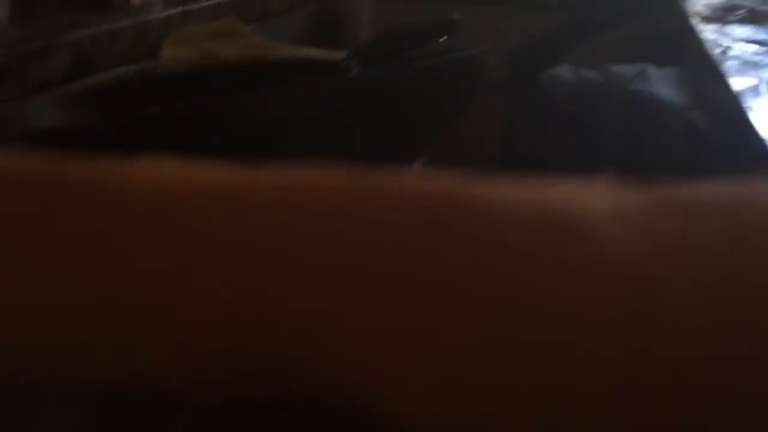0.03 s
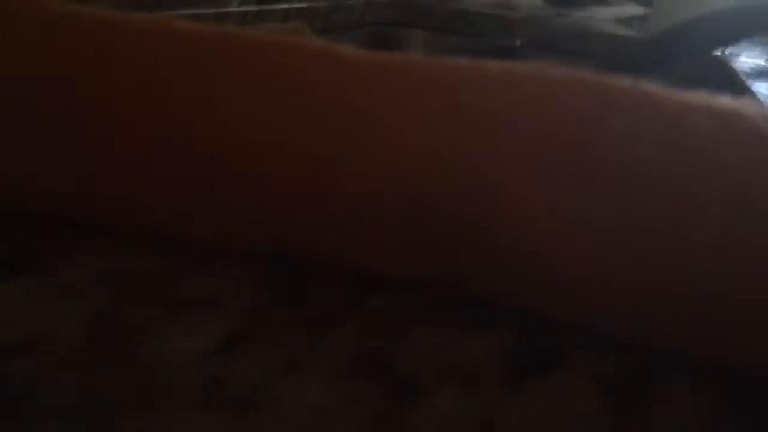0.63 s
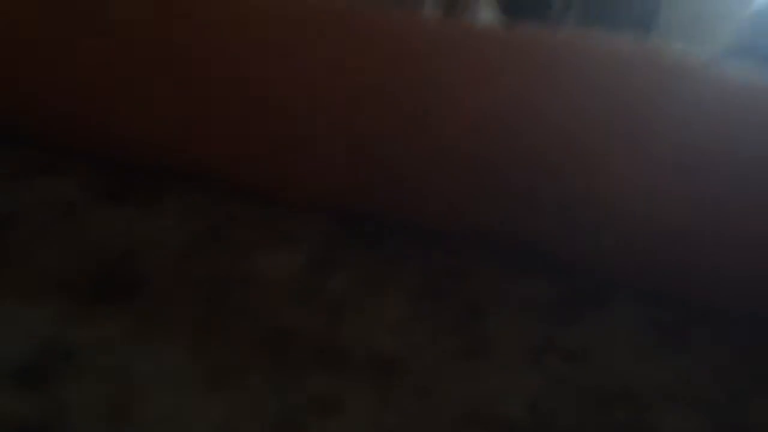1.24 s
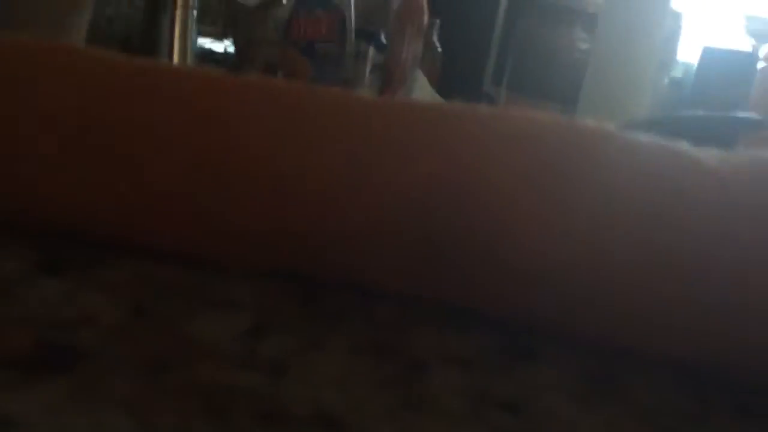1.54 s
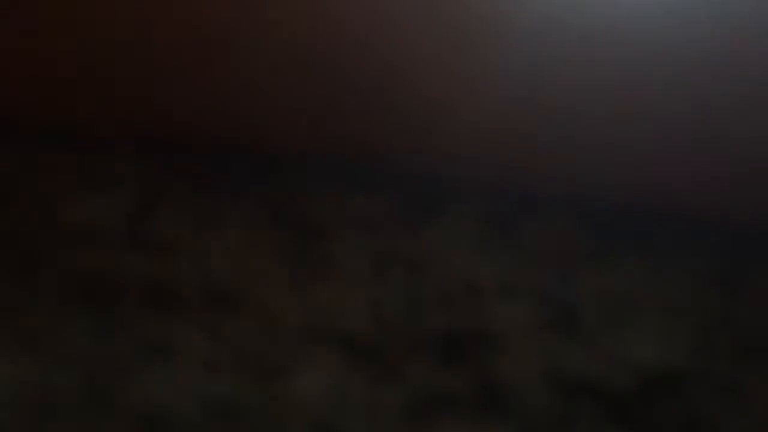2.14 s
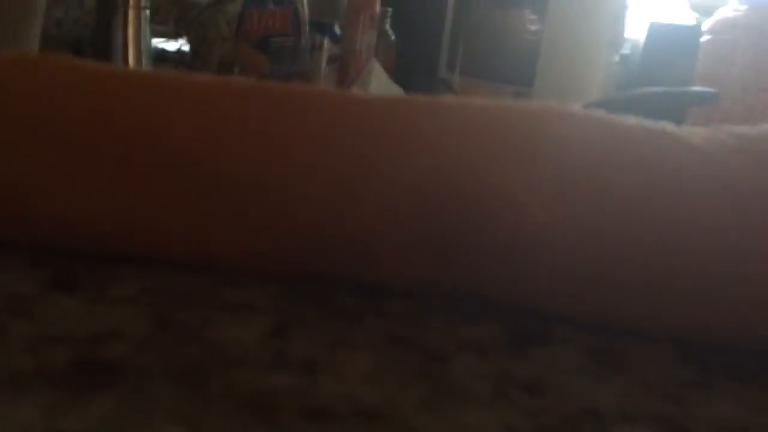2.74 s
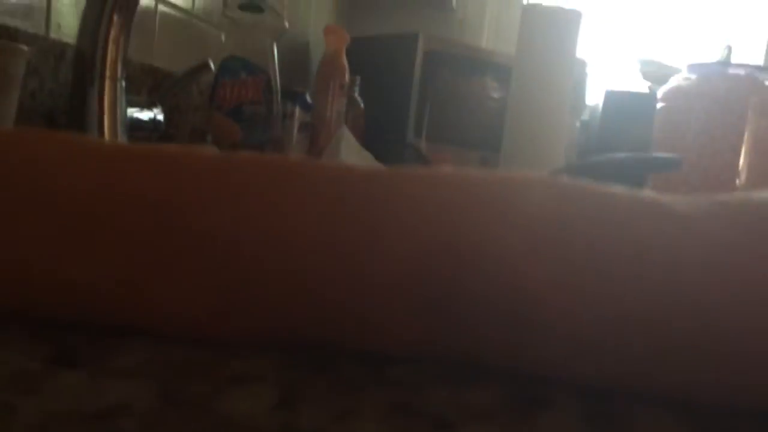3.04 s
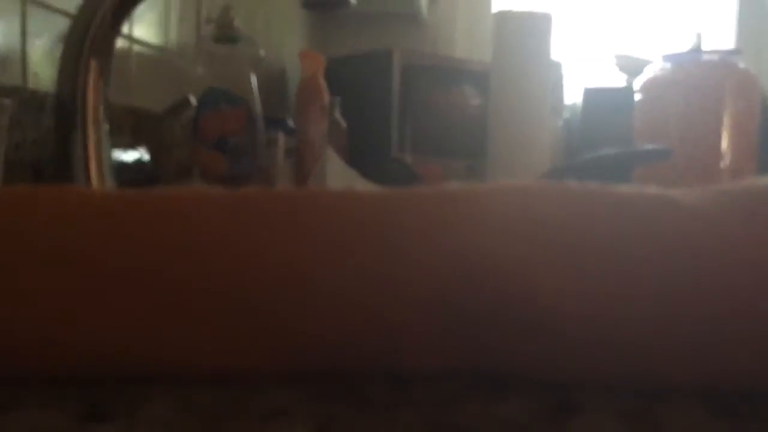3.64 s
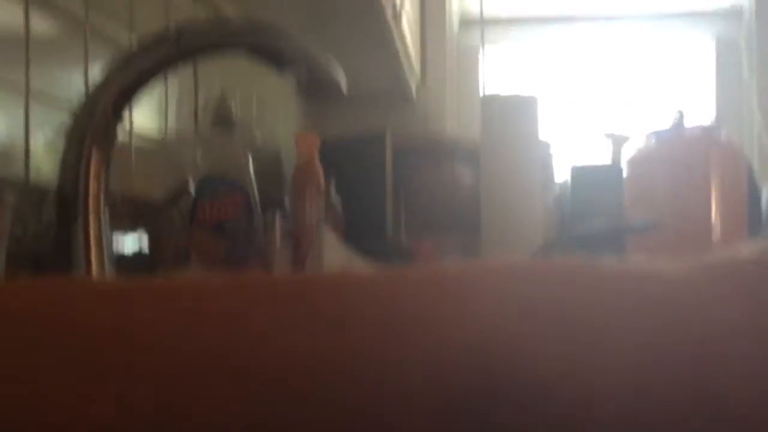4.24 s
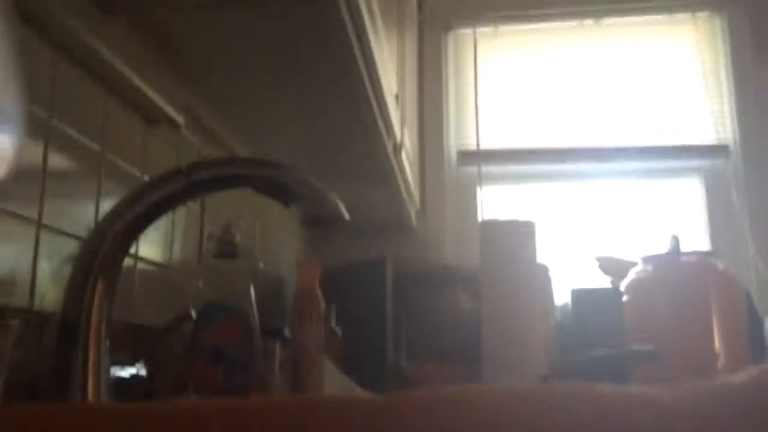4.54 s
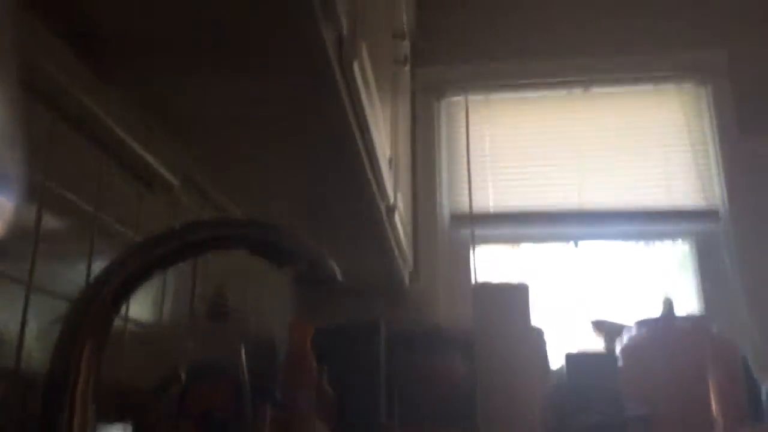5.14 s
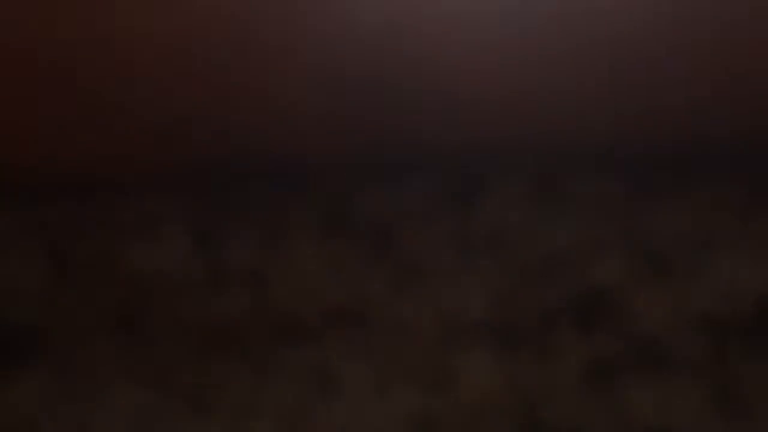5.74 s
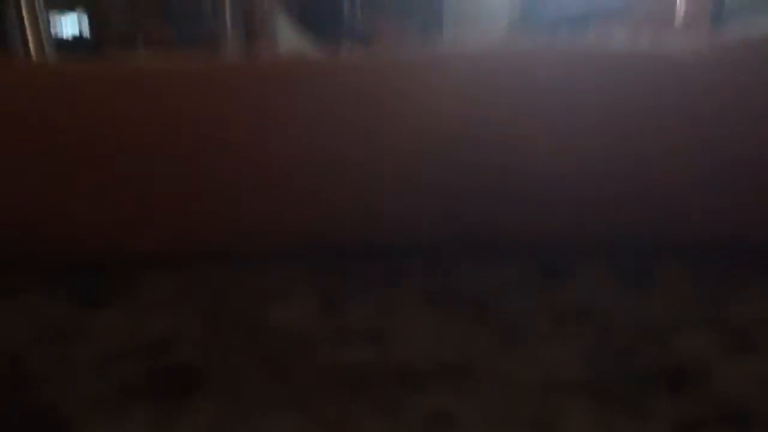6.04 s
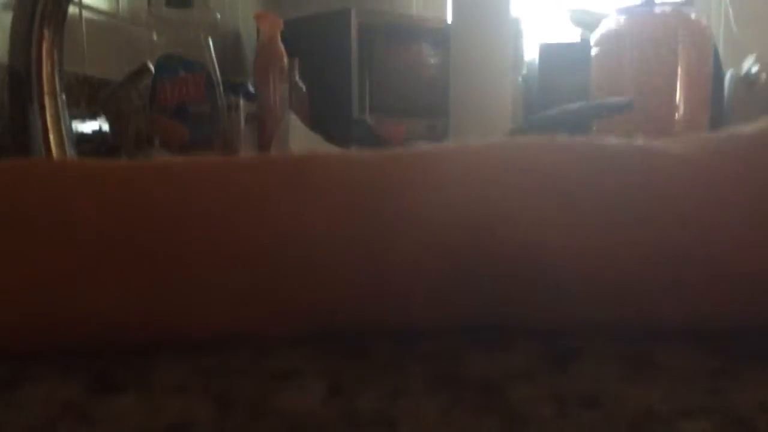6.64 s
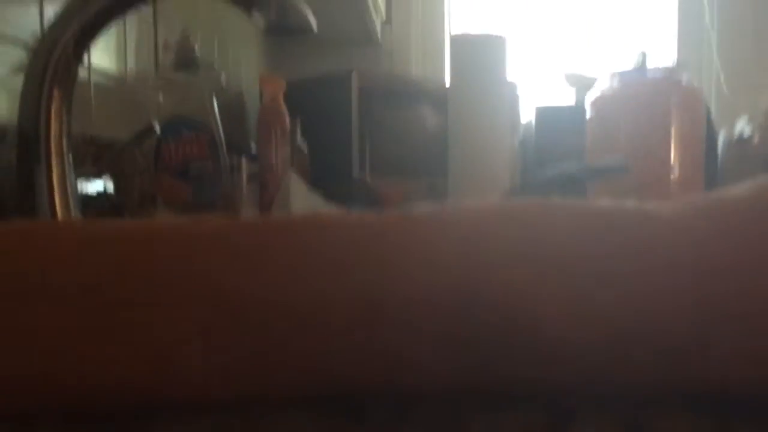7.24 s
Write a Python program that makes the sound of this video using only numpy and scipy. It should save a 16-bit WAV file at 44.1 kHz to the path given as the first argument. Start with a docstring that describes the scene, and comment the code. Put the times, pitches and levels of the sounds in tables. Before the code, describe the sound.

Faint, close rubbing of skin on wet cloth comes in short, uneven strokes with little clicks as the fibres let go. The phone picking it up is being moved about, so its case scuffs, rumbles and takes a few sharp, briefly ringing knocks. The rubbing thins out in the second half, leaving scattered taps and scuffs over the low hum of a kitchen appliance.

```python
"""Wet cloth at a kitchen sink

Hands work a wet cloth right beside a phone that is being shifted about. Cloth and skin
catch and slip in short strokes, and wet fibres let go with little snaps. The grip rumbles
through the phone's case, fingers tap it, and a few sharp knocks make it ring.
Under it all an appliance hums in the small, hard room."""
import sys
import numpy as np
from scipy import signal
from scipy.fft import rfft, irfft, next_fast_len
from scipy.io import wavfile
from scipy.ndimage import uniform_filter1d, map_coordinates

SR = 44100
rng = np.random.default_rng(int(sys.argv[2]) if len(sys.argv) > 2 else 0)


def to_wav(sig):
    """Store sig (one row per channel, or 1-D mono) as 16-bit WAV at the path in sys.argv[1].

    Samples outside -1..1 are clipped; the rate is SR.
    """
    pcm = np.clip(np.atleast_2d(sig), -1, 1) * 32767
    pcm = np.round(pcm).astype(np.int16)
    wavfile.write(sys.argv[1], SR, pcm.T)  # frames by channels


N = 321108

# Strokes of the cloth (pressed cloth rasps, fibres hiss, the case is scuffed):
# start_s, length_s, rasp_db, hiss_db, scuff_db
CLOTH_STROKES = [(.005, 0.01, -63, -61, -72), (.058, 0.071, -59, -54.5, -58), (.155, 0.11, -57, -53, -65),
                 (.28, 0.1, -53.5, -51, -55.5), (.365, 0.075, -59.5, -70, -51.5), (.45, .06, -70, -67, -61),
                 (.505, .08, -59.5, -56, -58), (.595, 0.13, -54.5, -58, -60), (.72, 0.12, -52, -59.5, -60),
                 (.857, 0.0063, -44.5, -53, -50), (.89, 0.044, -63, -57, -65),
                 (.988, 0.062, -58.5, -66.5, -57), (1.085, 0.057, -73, -69, -60.5),
                 (1.14, 0.063, -57.5, -57, -56), (1.205, 0.086, -53.5, -57.5, -54.5),
                 (1.29, .07, -64, -56, -53.5), (1.38, 0.2, -66, -65.5, -58.5),
                 (1.6, 0.34, -64.5, -66.5, -60.5), (1.89, 0.069, -59.5, -59.5, -53.5),
                 (1.96, 0.11, -62.5, -65, -58), (2.125, .18, -63, -64.5, -56.5),
                 (2.32, 0.24, -69.5, -72.5, -58), (2.55, 0.18, -66, -68, -59.5),
                 (2.755, 0.089, -62.5, -73, -56), (2.832, 0.065, -56.5, -69, -57),
                 (2.915, 0.02, -66.5, -84, -58), (3.103, 0.15, -64.5, -76, -58),
                 (3.262, 0.041, -61, -65.5, -55), (3.342, 0.016, -62, -66, -54),
                 (3.405, 0.049, -62.5, -74, -60.5), (3.5, 0.11, -58.5, -68.5, -57.5),
                 (3.935, 0.022, -62.5, -60.5, -55), (4.012, 0.024, -63.5, -67, -59),
                 (4.148, 0.036, -70, -73, -59.5), (4.205, 0.036, -60.5, -64, -54),
                 (4.305, 0.053, -61.5, -65.5, -57.5), (4.38, 0.18, -77, -79, -66),
                 (4.815, 0.019, -77, -77, -62), (5.045, 0.024, -68.5, -70, -63),
                 (5.21, 0.0051, -65, -65, -56), (5.257, .008, -70, -70, -57), (5.28, .025, -72, -79, -67),
                 (5.51, 0.11, -69.5, -70, -57.5), (5.69, 0.058, -72.5, -79, -63.5),
                 (5.78, 0.047, -67.5, -71, -59.5), (5.9, 0.047, -62, -66.5, -57.5),
                 (5.965, 0.053, -69.5, -76, -56.5), (6.04, 0.2, -80, -75, -62), (6.18, 0.22, -72, -71, -56),
                 (6.36, .065, -59, -64, -61.5), (6.46, 0.0072, -66, -67, -55),
                 (6.772, 0.019, -72.5, -84, -61), (7.122, 0.0067, -71, -78, -56.5),
                 (7.172, 0.0081, -70, -78, -61)]
# The hollow under the hand changes size and seal: time_s, pitch_hz, whistle_over_rasp_db
HAND_HOLLOW = [(.2, 3580, -7), (.43, 3280, -4), (.62, 2970, -4), (.8, 2750, -1), (.87, 2620, -5),
               (1.0, 2730, -3), (1.26, 2670, 0), (2.0, 2300, -12), (2.87, 2560, -8), (3.3, 2310, -23),
               (3.55, 3100, -1), (4.04, 3260, -2), (4.3, 3030, -14), (6.0, 2300, -6), (6.33, 3170, 1),
               (6.42, 3100, 1), (6.8, 2290, 1)]
# Quick swipes of tight cloth: middle_s, half_length_s, pitch_hz, level_db
CLOTH_SWIPES = [(.123, .015, 4260, -58.5), (0.173, 0.021, 6600, -54.5), (0.347, .021, 4350, -54),
                (.88, 0.026, 4950, -55.5), (2.863, 0.054, 6500, -67), (3.348, 0.0077, 10000, -66),
                (3.954, .014, 10500, -64), (4.216, 0.013, 5000, -63), (5.92, 0.019, 5600, -61.5)]
# The fingers shift their grip on the case: start_s, length_s, drag_db, rumble_db
GRIP_SHIFTS = [(0, 0.026, -71, -50), (.08, 0.074, -53.5, -49), (.235, 0.069, -56, -51.5),
               (.33, .09, -60, -58), (.52, 0.29, -60.5, -60), (.75, 0.13, -61, -51),
               (1.14, 0.23, -61.5, -58), (1.4, 0.26, -69, -74), (1.96, 0.1, -57, -73),
               (2.15, .2, -63.5, -76), (2.495, 0.23, -50, -56), (2.595, 0.047, -47, -59),
               (2.78, 0.37, -60.5, -67), (3.125, 0.038, -51, -67), (3.22, .34, -50, -70),
               (3.26, 0.046, -52.5, -59), (3.93, 0.025, -54, -58), (4.18, .17, -58, -58.5),
               (4.81, .02, -60, -71), (4.98, 0.04, -56, -64), (5.72, 0.054, -53, -65),
               (5.877, .12, -56.5, -53.5), (6.2, 0.037, -48.5, -58), (6.28, 0.16, -54.5, -64),
               (6.9, 0.28, -60, -66)]
# Knocks on the phone: time_s, ring_db, crack_db, spot (0, 1 or 2)
PHONE_KNOCKS = [(1.0302, -0.5, -48, 0), (1.0533, -10, -62, 0), (3.588, 0, -30, 1), (5.5671, 2, -52, 2),
                (5.893, -20, -58, 2)]
# Ringing tones of the phone and what it leans on (a fade is the time to drop by 60 dB):
# pitch_hz, fade_s, spot_0_db, spot_1_db, spot_2_db
CASE_TONES = [(84, 0.13, -41, -33, -60), (177, 0.036, -29.5, -38, -20.5), (235, 0.022, -44, -27, -15.5),
              (325, 0.023, -33.5, -15.5, -19.5), (490, 0.081, -31.5, -25.5, -25),
              (616, 0.014, -20, -15, -23), (878, 0.011, -29, -8, -32.5), (1170, 0.023, -34.5, -18.5, -42),
              (1365, 0.015, -41, -12.5, -36.5), (1660, 0.0094, -38, -40, -42), (855, 0.15, -66, -30, -47.5),
              (705, 0.5, -67, -46.5, -56)]
# Snaps of wet fibres: time_s, peak_db, pitch_hz
FIBRE_SNAPS = [(.053, -41, 2460), (0.5825, -32.5, 2960), (0.8617, -32, 2500), (1.041, -32.5, 4070),
               (1.063, -38, 3000), (1.077, -37, 4500), (1.088, -43, 5000), (1.2866, -45, 2000),
               (2.2998, -43, 2500), (2.631, -40, 3500), (2.847, -35.5, 2700), (3.296, -38, 2300),
               (3.5998, -39, 2970), (3.6202, -43, 3000), (3.6296, -41, 3440), (3.6565, -46, 3800),
               (4.2045, -46, 3000), (4.356, -48, 3500), (4.815, -48, 3000), (5.067, -46.5, 4000),
               (5.259, -46, 2200), (5.436, -48, 3100), (6.149, -44.5, 2150), (6.468, -42, 3300),
               (6.541, -50, 2780), (7.182, -56, 1580)]
# Palm bumps and fingertip taps: time_s, level_db, pitch_hz
HAND_TOUCHES = [(0.085, -30, 146), (.114, -36, 105), (.163, -37, 61), (0.293, -39, 108), (.368, -43, 1420),
                (0.411, -43, 1060), (1.031, -36, 114), (1.2863, -29.5, 1290), (2.301, -34.5, 1500),
                (2.4516, -37.5, 900), (2.609, -35, 310), (3.2622, -51, 1300), (3.52, -46, 1400),
                (3.945, -35.5, 282), (4.2025, -41, 1490), (4.3967, -39.5, 1460), (5.214, -42, 1380),
                (5.4358, -33.5, 1380), (7.17, -43, 1480)]
# The tone colour of each noise, from low to high: frequency_hz, relative_db
HISS_COLOUR = [(1200, 2.5), (2500, -3.5), (4500, 2), (6500, 1.5), (9000, -1), (12000, -4), (15000, -5)]  # sliding fibres
RASP_COLOUR = [(1200, -9.5), (1900, 0), (2500, 2.5), (3600, -5), (5000, -9.5), (9000, -43)]  # pressed cloth
SCUFF_COLOUR = [(300, -12), (600, 3), (800, 0.5), (1080, -1.5), (1400, 0), (1900, -9.5), (3000, -35)]  # rubbing on the case
DRAG_COLOUR = [(90, -23), (180, 0.5), (240, 8.5), (310, 11.5), (420, 9), (600, 0), (1000, -48)]  # dragging fingers
RUMBLE_COLOUR = [(20, -41), (45, -1.5), (85, 6), (140, 5), (220, -2), (450, -49)]  # the grip, heard through the case
AIR_COLOUR = [(25, -50), (52, -0.5), (80, -3), (125, -1), (240, -6), (330, -3.5), (460, -5), (700, -12.5),
              (1100, -19), (1550, -26.5), (2000, -31.5), (4000, -35.5), (8000, -40.5), (15000, -43)]  # the soft rush of the room
# How long the kitchen's echo lasts: frequency_hz, fade_s
ECHO_FADES = [(100, 0.47), (700, 0.3), (2000, 0.04), (10000, 0.11)]
# The tones of the appliance: pitch_hz, level_db
HUM_TONES = [(117.6, -58.5), (81.4, -70.5), (326.6, -64.5), (404.4, -66.5), (497, -70.5)]
# The hand shields the microphone from the hum and the rush: time_s, gain_db
HAND_SHIELD = [(0, -3.5), (1.3, -5.5), (1.6, -5.5), (2.3, -8), (2.7, -1), (7.28, -2)]

STROKE_ATTACK_S, STROKE_RELEASE_S = 0.0086, 0.03
GRIP_ATTACK_S, GRIP_RELEASE_S = 0.019, 0.042  # the fingers move more slowly than the cloth
RESTING_SCUFF_DB, RESTING_RUMBLE_DB = -70, -61.5  # the holding hand is never quite still


def rubbing(cling_db=0.87):
    """Each stroke drags wet fibres over skin and case; all its noises catch and let go together."""
    rasp_gain, hiss_gain, scuff_gain = swells(CLOTH_STROKES, STROKE_ATTACK_S, STROKE_RELEASE_S)
    drag_gain, _ = swells(GRIP_SHIFTS, GRIP_ATTACK_S, GRIP_RELEASE_S)
    _, seal_db = curves(HAND_HOLLOW)
    catch_db = .8 * wobble(45) + .8 * wobble(220)
    fibres = coloured(slips(per_s=2700, spread_db=1, smooth=1.0), HISS_COLOUR)
    hiss = hiss_gain * folds(fibres, depth_db=2.0)
    whistle = hollow(slips(per_s=2000, spread_db=3, smooth=0.67), sharpness=5.0)
    pressed = coloured(slips(per_s=2400, spread_db=5, smooth=0.77), RASP_COLOUR)
    blend = amp(seal_db) * whistle + folds(pressed, depth_db=3.5)
    rasp = rasp_gain * blend / np.hypot(1, amp(seal_db))  # the seal changes tone, not strength
    case_rub = coloured(slips(per_s=900, spread_db=4.0, smooth=1.0), SCUFF_COLOUR)
    scuff = np.hypot(scuff_gain, amp(RESTING_SCUFF_DB)) * folds(case_rub, depth_db=3)
    drag = drag_gain * coloured(slips(per_s=400, spread_db=2.5, smooth=0.89), DRAG_COLOUR)
    cling = amp(cling_db * wobble(70))  # wet fibres cling and peel off unevenly
    cloth = lift_off() * cling * (hiss + rasp)
    return amp(catch_db) * (cloth + scuff + drag + swipes())


def slips(per_s, spread_db, smooth):
    """Rubbing surfaces stick and slip: tiny uneven clicks over smooth sliding noise."""
    clicks = rng.random(N) < per_s / SR
    size = rng.choice([-1, 1], N) * amp(spread_db * np.clip(rng.standard_normal(N), -2, 2))
    return unit(unit(clicks * size) + smooth * rng.standard_normal(N))


def folds(x, depth_db):
    """Folds of cloth come and go, each bringing out its own frequencies."""
    spectra = signal.stft(x, SR, nperseg=512)[2]
    patches = uniform_filter1d(rng.standard_normal(spectra.shape), size=6, axis=0)  # blur in pitch
    patches = uniform_filter1d(patches, size=10, axis=1)  # blur in time
    return unit(signal.istft(spectra * amp(depth_db * unit(patches)), SR, nperseg=512)[1][:N])


def hollow(x, sharpness):
    """The gap between hand and cloth brings out one pitch, which moves as the gap changes size."""
    hz, t, spectra = signal.stft(x, SR, nperseg=512)
    time_s, pitch_hz, _ = np.transpose(HAND_HOLLOW)
    peak = resonance(hz[:, None], np.interp(t, time_s, pitch_hz), sharpness) ** 2
    return unit(signal.istft(spectra * peak, SR, nperseg=512)[1][:N])


def lift_off(depth_db=22, length_s=0.1):
    """A brief dip in level: the cloth lifts off just after the knock with the loudest crack."""
    knock_s = max(PHONE_KNOCKS, key=lambda knock: knock[2])[0]
    after_s = np.arange(N) / SR - knock_s
    return amp(-depth_db * (after_s > 0) * np.exp(-(after_s / length_s) ** 2))


def swipes(sharpness=2.9):
    """Tight cloth slides fast and hisses around one pitch."""
    out, t = np.zeros(N), np.arange(N) / SR
    for middle_s, half_length_s, pitch_hz, level_db in CLOTH_SWIPES:
        hiss = filtered(rng.standard_normal(N), lambda hz: resonance(hz, pitch_hz, sharpness) ** 2)
        out += amp(level_db) * np.exp(-((t - middle_s) / half_length_s) ** 2) * unit(hiss)
    return out


def knocks(attack_s=0.00016, crack_fade_s=0.016):
    """Each knock cracks on the plastic and rings the same tones; the spot hit sets their balance."""
    out, t = np.zeros(N), np.arange(SR // 3) / SR
    hz, fade_s, *spots_db = np.transpose(CASE_TONES)
    direction = (-1) ** np.arange(len(hz))  # each tone swings the opposite way to the one before
    tones = direction[:, None] * np.sin(2 * np.pi * hz[:, None] * t) * amp(-60 * t / fade_s[:, None])
    for time_s, ring_db, crack_db, spot in PHONE_KNOCKS:
        ring = amp(ring_db + spots_db[spot]) @ tones * (1 - np.exp(-t / attack_s))
        crack = signal.lfilter(*signal.butter(2, 8500, fs=SR), rng.standard_normal(len(t)))
        add(out, time_s, ring + amp(crack_db - 60 * t / crack_fade_s) * crack)
    return out


def snaps(sharpness=1.0, brightness=0.031, crumble_cycles=5, crumble_gain=0.19):
    """A fibre or film of water lets go: one click and a brief crumble, shorter for higher snaps."""
    out, t = np.zeros(N), np.arange(2048) / SR
    hz = np.fft.rfftfreq(len(t), 1 / SR)
    click = t == 0
    for time_s, peak_db, pitch_hz in FIBRE_SNAPS:
        crumble = crumble_gain * rng.standard_normal(len(t)) * np.exp(-t * pitch_hz / crumble_cycles)
        snap = irfft(rfft(click + crumble) * (resonance(hz, pitch_hz, sharpness) + brightness))
        add(out, time_s, amp(peak_db) * snap / np.abs(snap).max())
    return out


def touches(fade_cycles=11.6):
    """A soft hand bumps the case and muffles it at once, so it swings only a few times."""
    out, t = np.zeros(N), np.arange(SR // 3) / SR
    for time_s, level_db, pitch_hz in HAND_TOUCHES:
        cycles = t * pitch_hz
        gain = amp(level_db - 60 * cycles / fade_cycles) * (1 - np.exp(-2 * cycles))
        add(out, time_s, gain * np.sin(2 * np.pi * cycles))
    return out


def crackle(level_db=-70, pitch_hz=3400, full_press_db=-64):
    """Tiny films of water part under every stroke, getting no louder once it presses fully."""
    rasp_gain, _, _ = swells(CLOTH_STROKES, STROKE_ATTACK_S, STROKE_RELEASE_S)
    pressure = np.tanh(rasp_gain / amp(full_press_db))
    clicks = slips(per_s=110, spread_db=2.5, smooth=0)
    pops = unit(filtered(clicks, lambda hz: resonance(hz, pitch_hz, sharpness=1.0)))
    return amp(level_db) * pressure * pops


def grip_rumble():
    """Shifting fingers reach the microphone through the case as a low rumble."""
    _, rumble_gain = swells(GRIP_SHIFTS, GRIP_ATTACK_S, GRIP_RELEASE_S)
    rumble = coloured(slips(per_s=160, spread_db=7.5, smooth=0.46), RUMBLE_COLOUR)
    return np.hypot(rumble_gain, amp(RESTING_RUMBLE_DB)) * rumble


def kitchen_echo(x):
    """Counter, tiles and cupboards throw the sound back as a short tail."""
    hz, t, spectra = signal.stft(rng.standard_normal(SR // 2), SR, nperseg=256)
    fade = amp(-60 * t / value_at(ECHO_FADES, hz)[:, None])
    tail = signal.istft(spectra * fade, SR, nperseg=256)[1]
    tail = np.pad(tail, (SR // 200, 0))  # the echo arrives 5 ms late
    return signal.fftconvolve(x, tail / np.linalg.norm(tail))[:N]


def appliance(air_db=-54):
    """A motor hums with slightly unsteady tones over the soft rush of the room."""
    hum, t = np.zeros(N), np.arange(N) / SR
    for pitch_hz, level_db in HUM_TONES:
        gain = amp(level_db + 2.0 * wobble(3.05)) * np.sqrt(2)
        hum += gain * np.sin(2 * np.pi * pitch_hz * t + 0.45 * wobble(4))
    return hum + amp(air_db) * coloured(rng.standard_normal(N), AIR_COLOUR)


def swells(rows, attack_s, release_s):
    """One gain curve per dB column: each row swells around its start, holds and dies away."""
    power = np.zeros((len(rows[0]) - 2, N))
    for start_s, length_s, *levels_db in rows:
        rise_s = attack_s + 0.2 * length_s  # long moves swell more slowly
        begin_s = max(start_s - rise_s / 2, 0)
        t = np.arange(SR) / SR + begin_s - start_s
        shape = np.clip(t / rise_s + .5, 0, 1) * np.exp(-np.maximum(t - length_s, 0) / release_s)
        for track, db in zip(power, levels_db):
            add(track, begin_s, (amp(db) * shape) ** 2)
    return np.sqrt(power)


def amp(db):
    """Turn decibels into a gain to multiply by."""
    return 10 ** (np.asarray(db) / 20)


def unit(x):
    """Scale x to an average power of 1."""
    return x / np.sqrt(np.mean(x ** 2) + 1e-20)


def value_at(table, hz):
    """Read between the rows of a table, on a log frequency scale."""
    row_hz, values = np.transpose(table)
    return np.interp(np.log(hz + 1), np.log(row_hz + 1), values)


def curves(rows):
    """One value per sample for each column after the time."""
    time_s, *columns = np.transpose(rows)
    return [np.interp(np.arange(N) / SR, time_s, column) for column in columns]


def wobble(per_s):
    """A smooth curve through per_s random points a second."""
    return map_coordinates(rng.standard_normal(int(N * per_s / SR) + 4), [np.arange(N) * per_s / SR])


def filtered(x, response):
    """Multiply each frequency in x by response(hz)."""
    size = next_fast_len(N + SR // 2)
    return irfft(rfft(x, size) * response(np.fft.rfftfreq(size, 1 / SR)), size)[:N]


def coloured(x, colour):
    """Give x a tone colour and an average power of 1."""
    return unit(filtered(x, lambda hz: amp(value_at(colour, hz))))


def resonance(hz, pitch_hz, sharpness):
    """A filter that favours one pitch; more sharpness (Q) makes it narrower."""
    damping = 1j * hz * pitch_hz / sharpness
    return damping / (pitch_hz ** 2 - hz ** 2 + damping)


def add(track, start_s, sound):
    """Mix a sound into the track at start_s."""
    part = track[round(start_s * SR):][:len(sound)]
    part += sound[:len(part)]


def scene():
    """Mix the close handling sounds with a little echo and the hum."""
    rub, blows = rubbing(), knocks()
    ticks = snaps() + touches() + crackle()
    echo = kitchen_echo(amp(-19.0) * blows + amp(-24) * (rub + ticks))
    shield_db, = curves(HAND_SHIELD)
    return (rub + grip_rumble() + blows + ticks + echo + amp(shield_db) * appliance())[None]


def record(dry):
    """The phone keeps nothing above 15400 Hz."""
    return filtered(dry[0], lambda hz: hz < 15400)[None]


dry = scene()
out = record(dry)
to_wav(out)
```